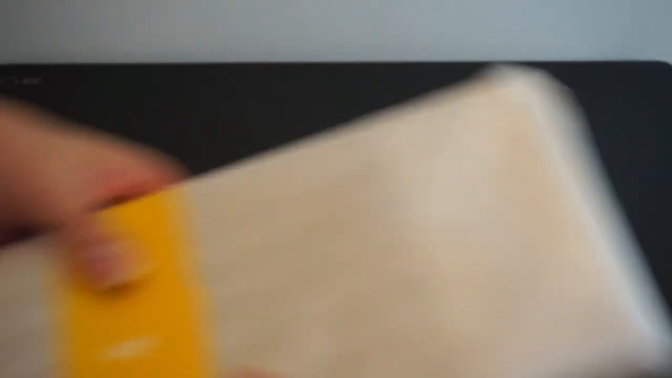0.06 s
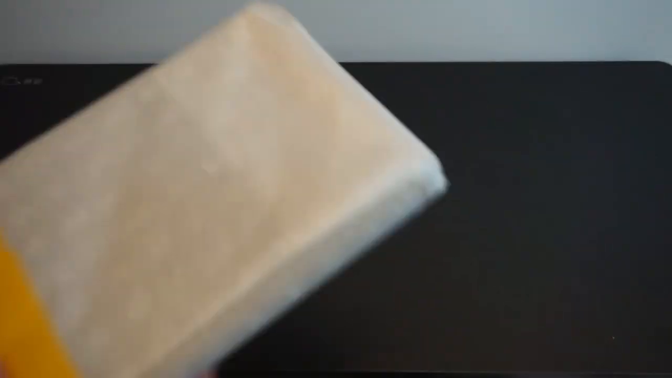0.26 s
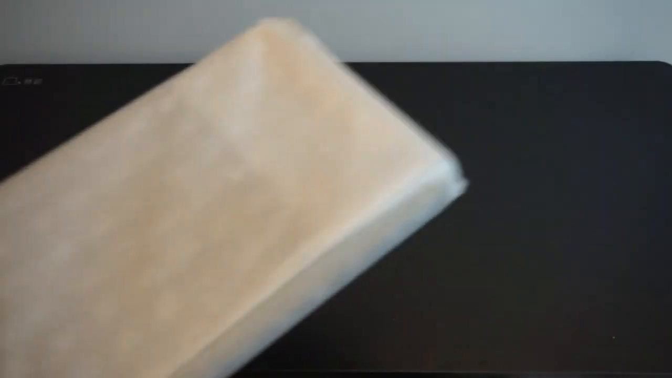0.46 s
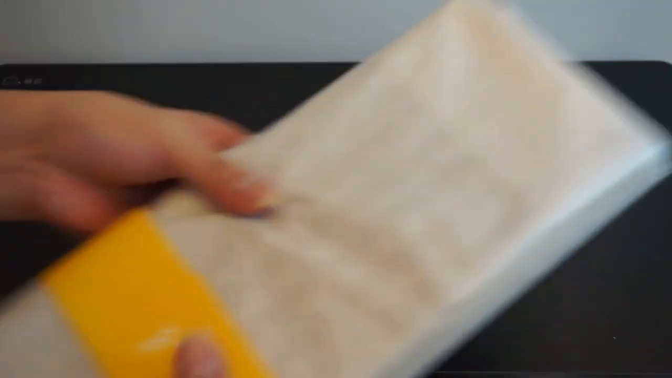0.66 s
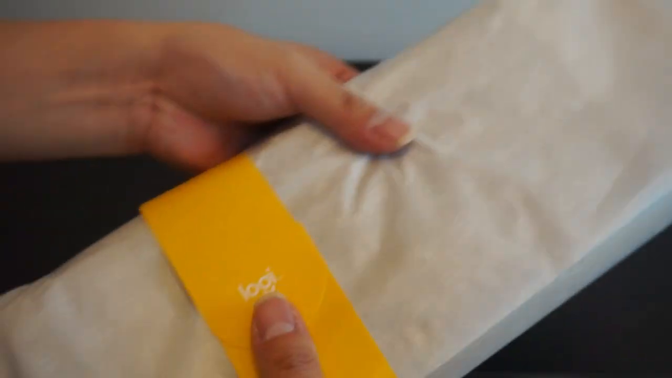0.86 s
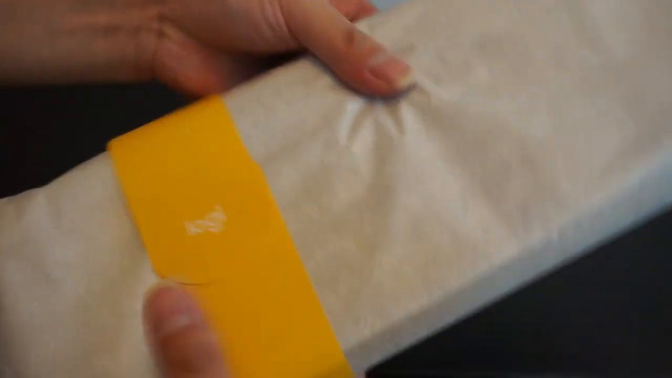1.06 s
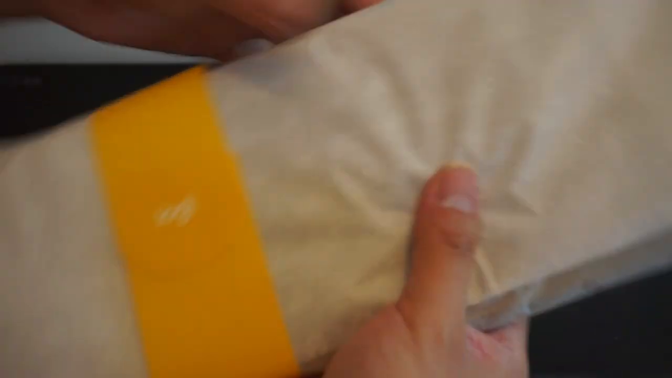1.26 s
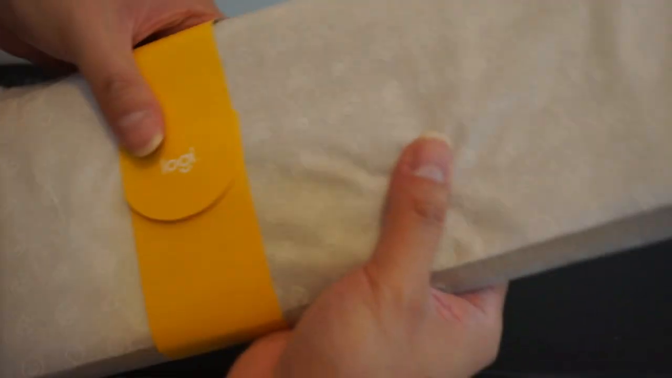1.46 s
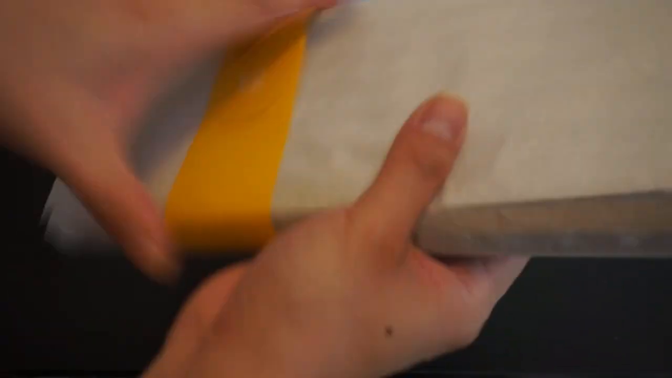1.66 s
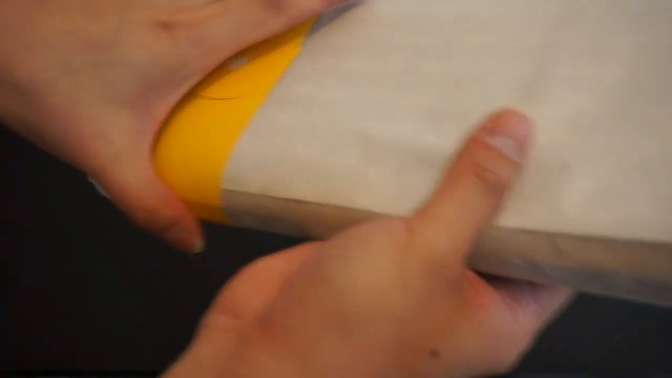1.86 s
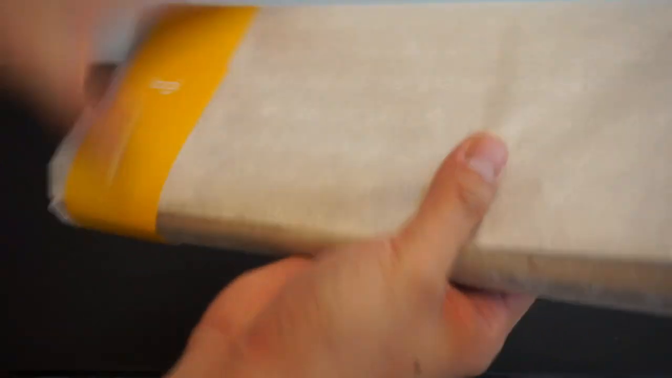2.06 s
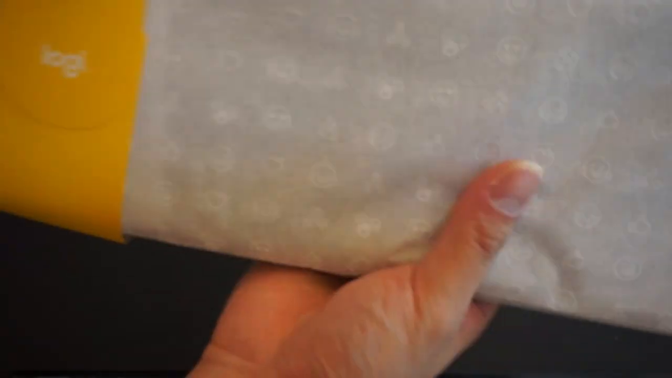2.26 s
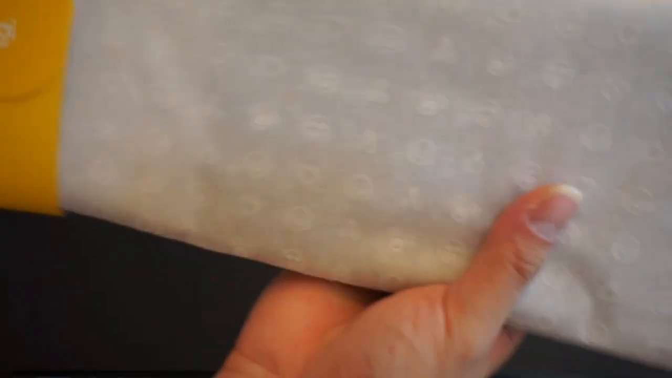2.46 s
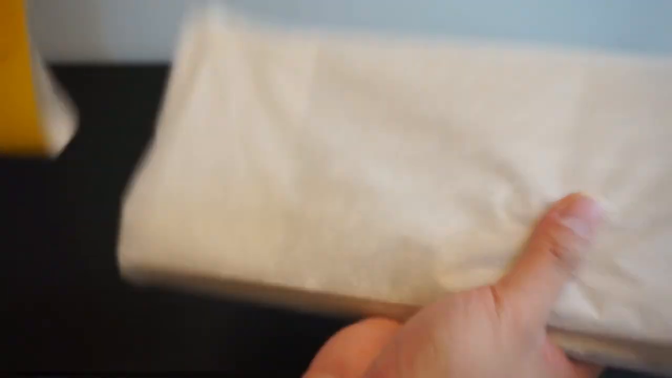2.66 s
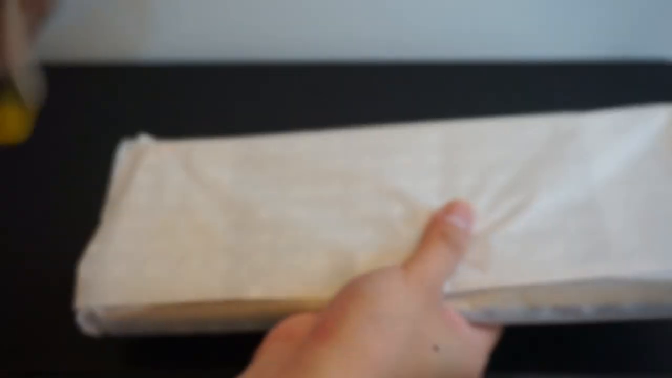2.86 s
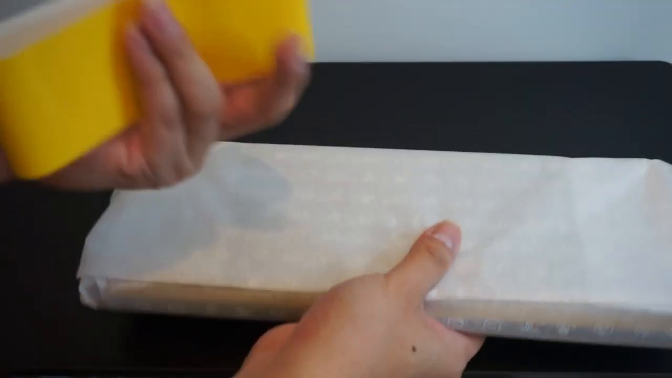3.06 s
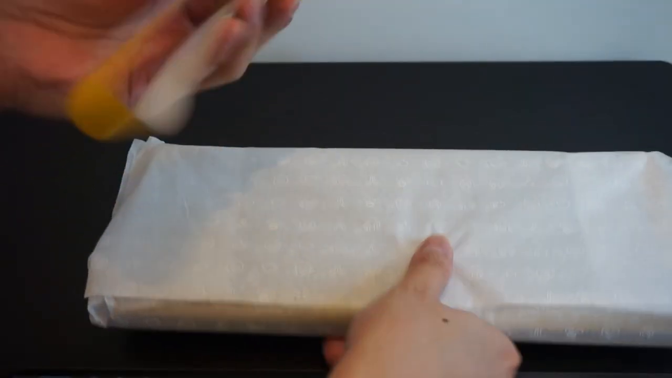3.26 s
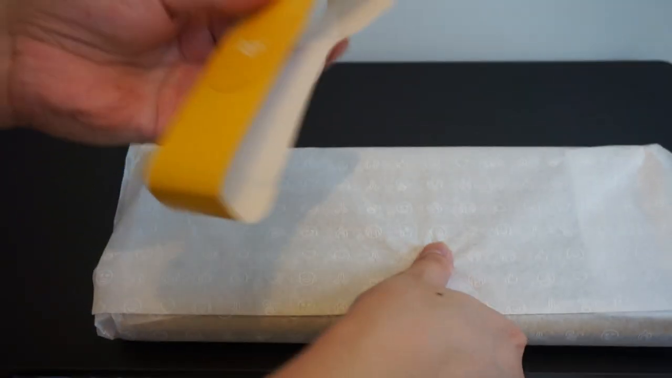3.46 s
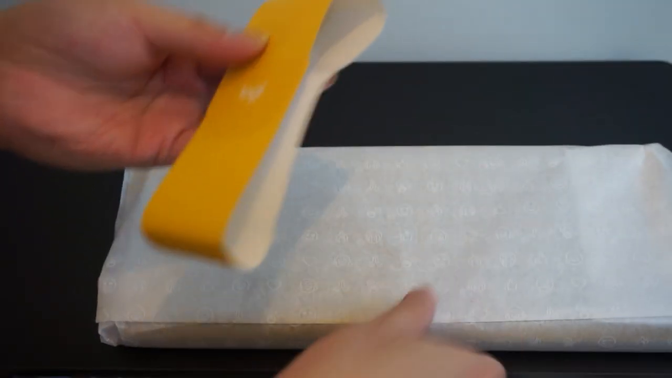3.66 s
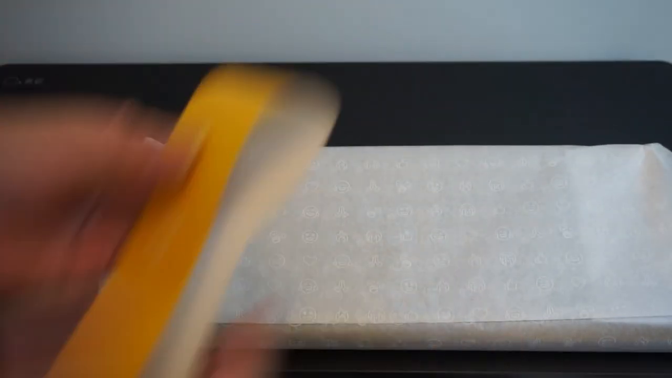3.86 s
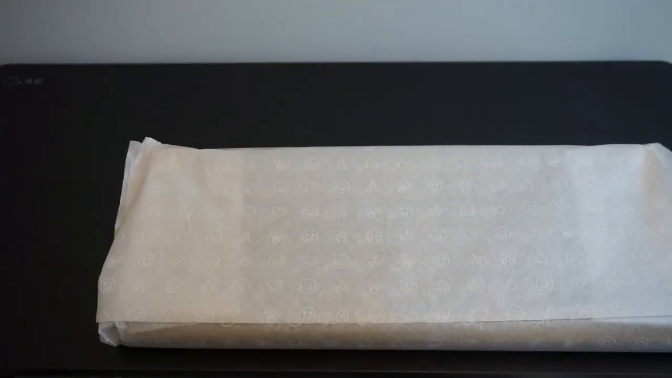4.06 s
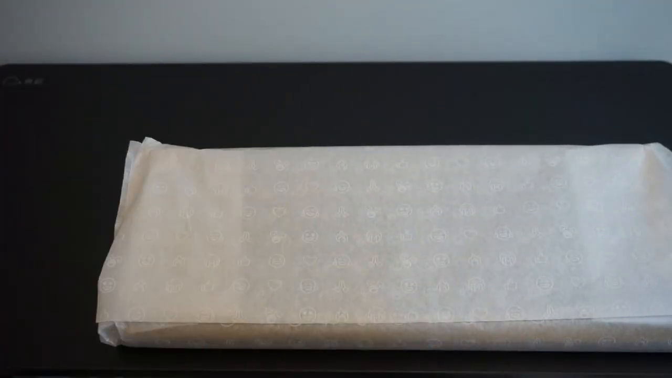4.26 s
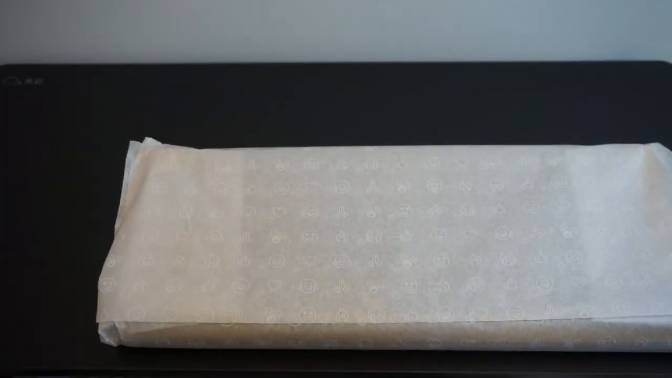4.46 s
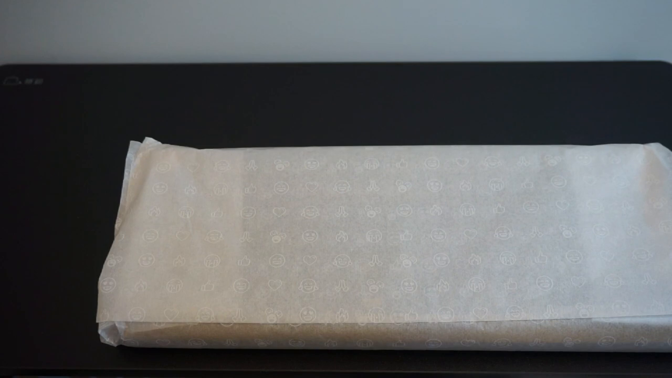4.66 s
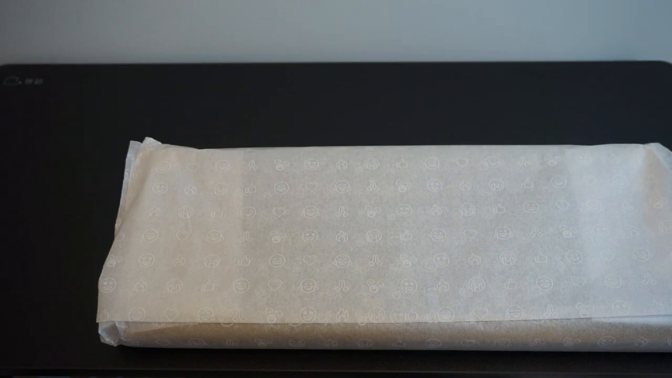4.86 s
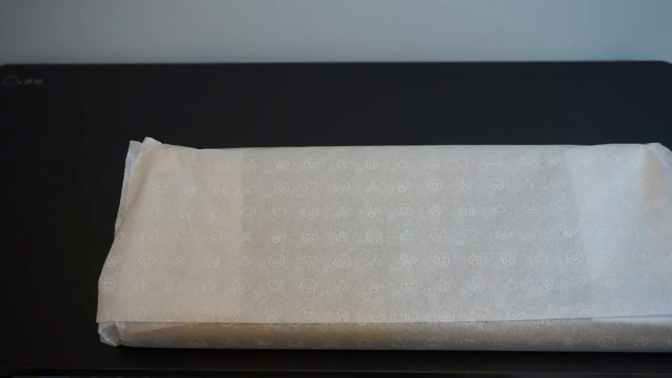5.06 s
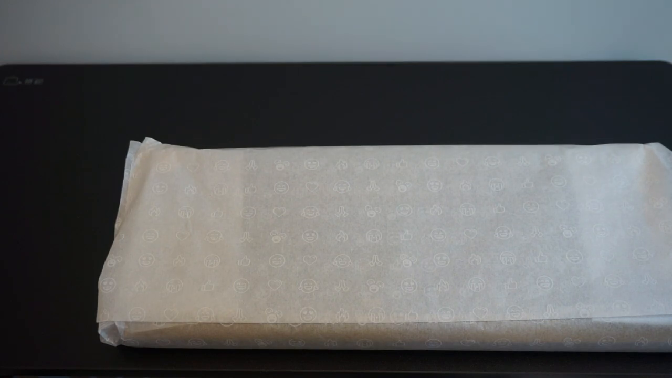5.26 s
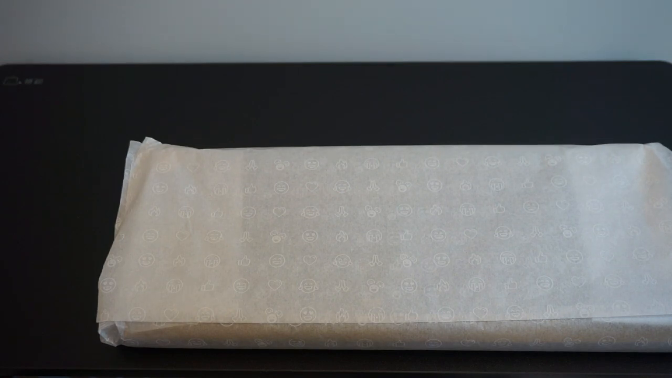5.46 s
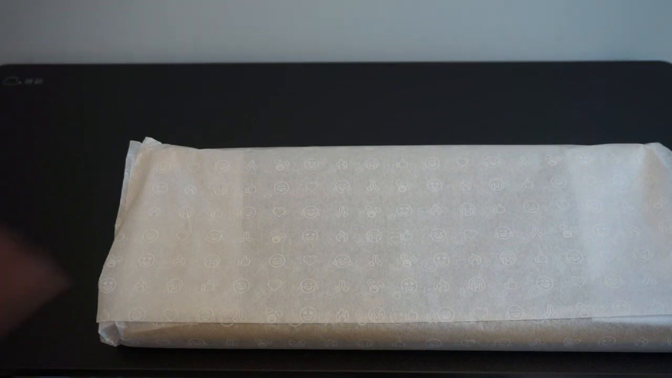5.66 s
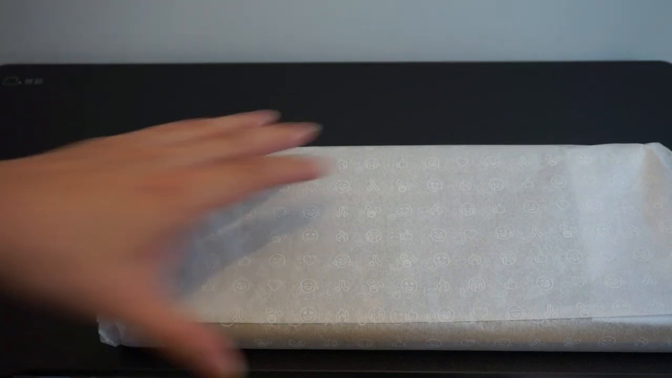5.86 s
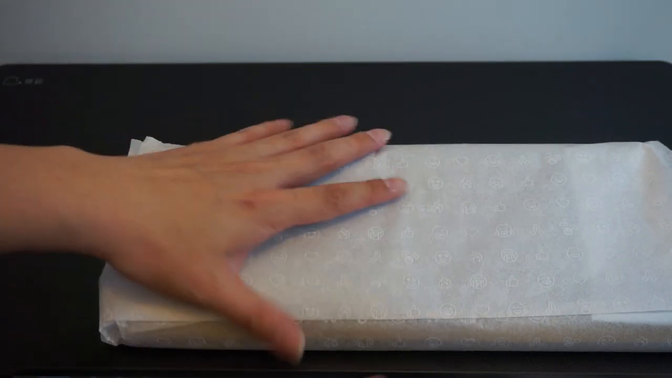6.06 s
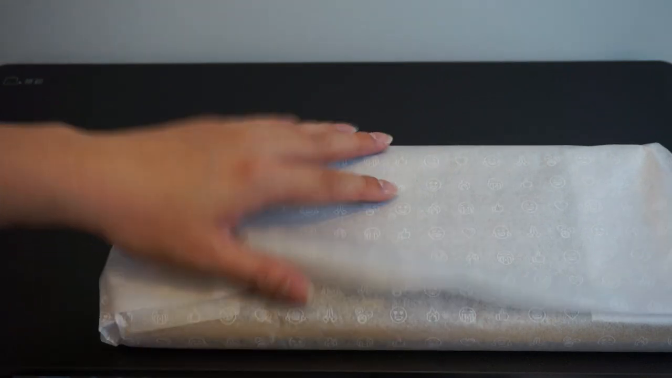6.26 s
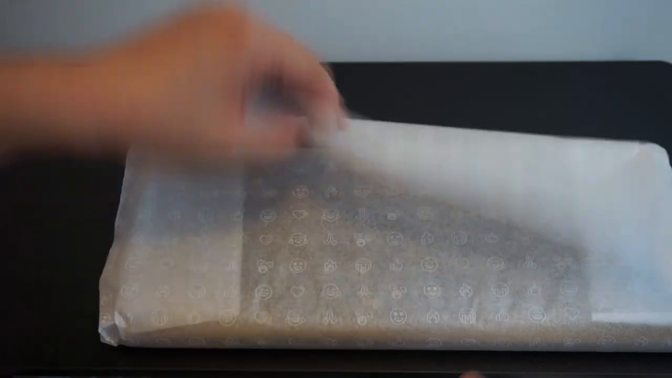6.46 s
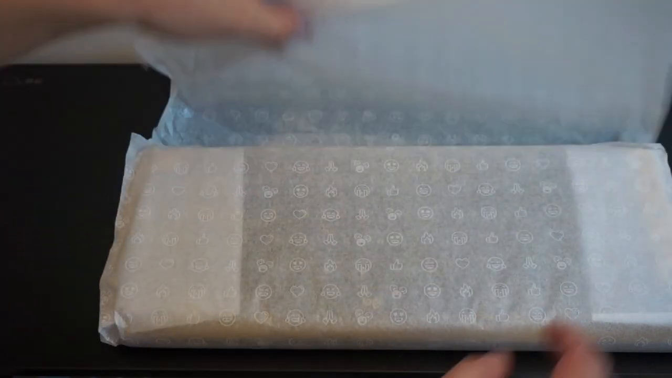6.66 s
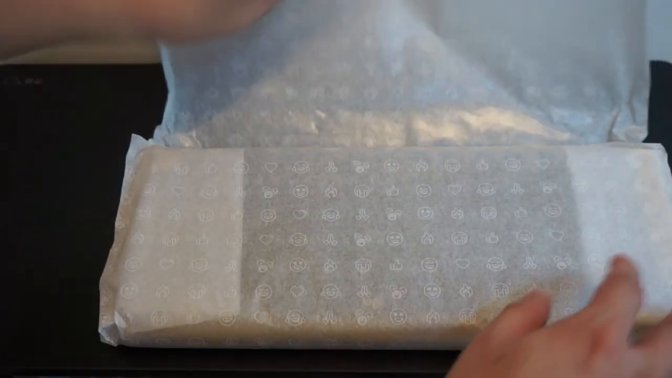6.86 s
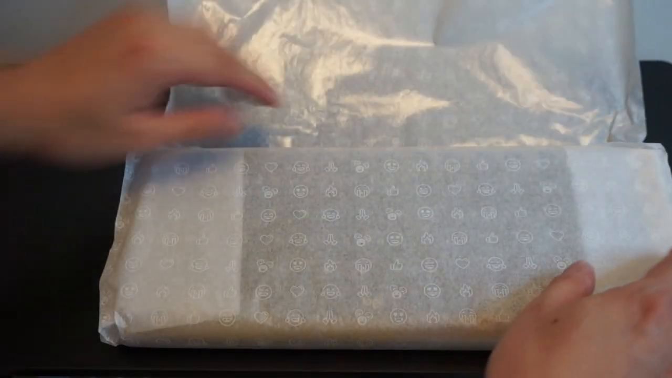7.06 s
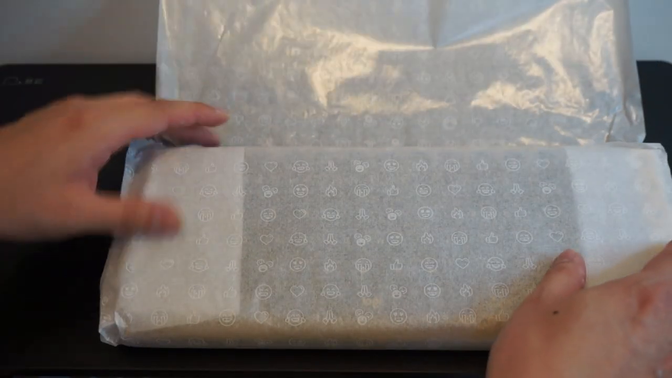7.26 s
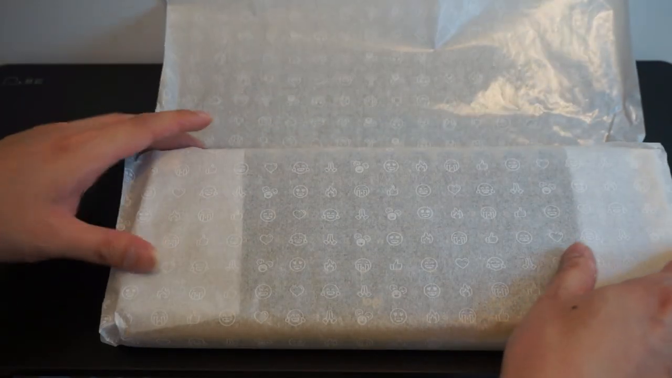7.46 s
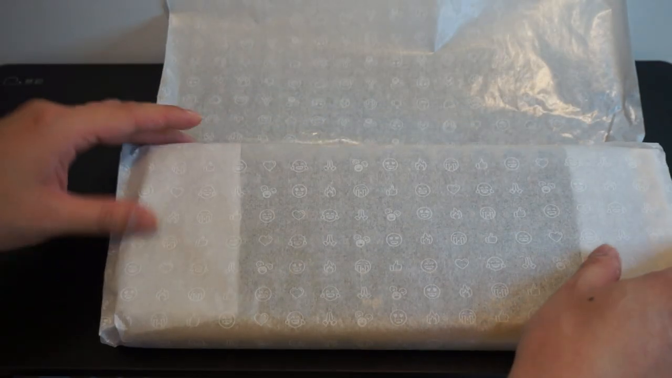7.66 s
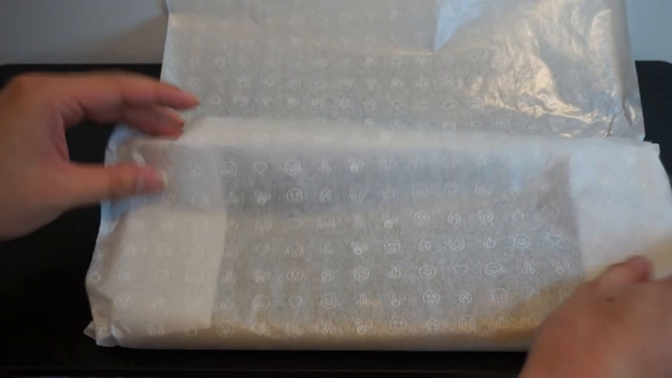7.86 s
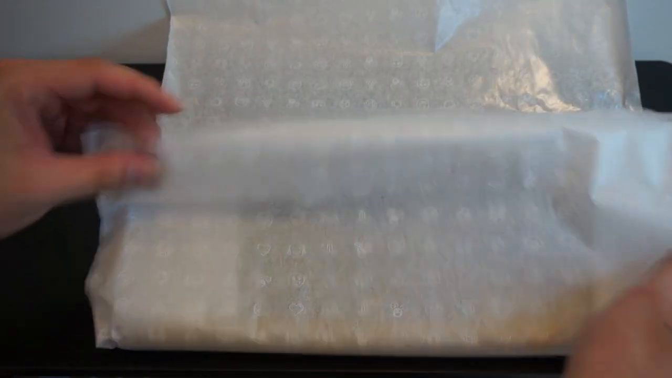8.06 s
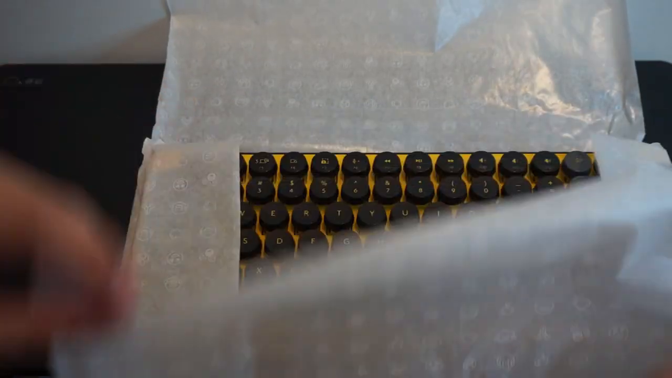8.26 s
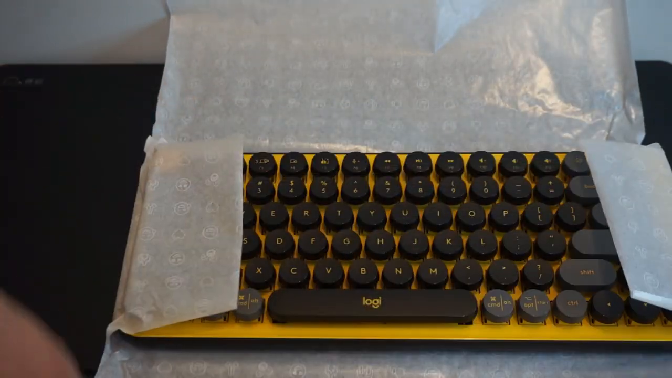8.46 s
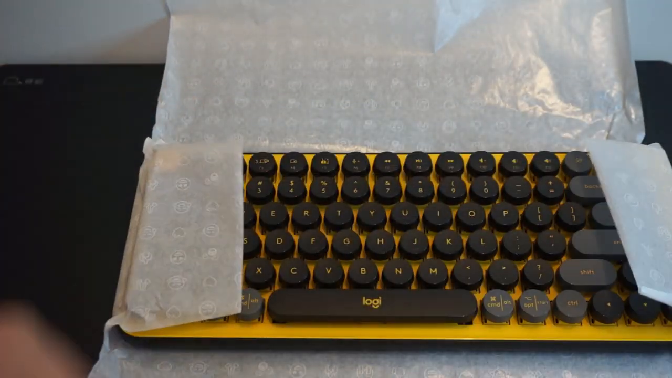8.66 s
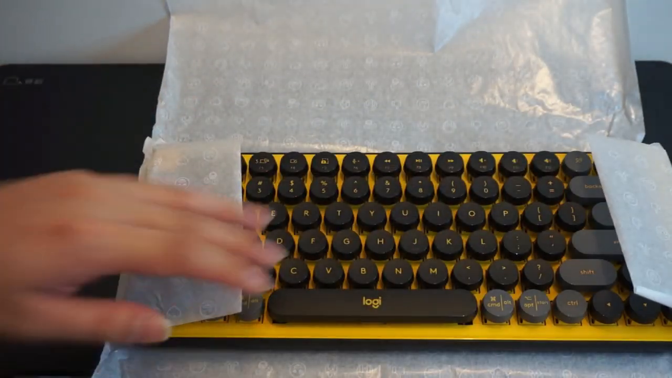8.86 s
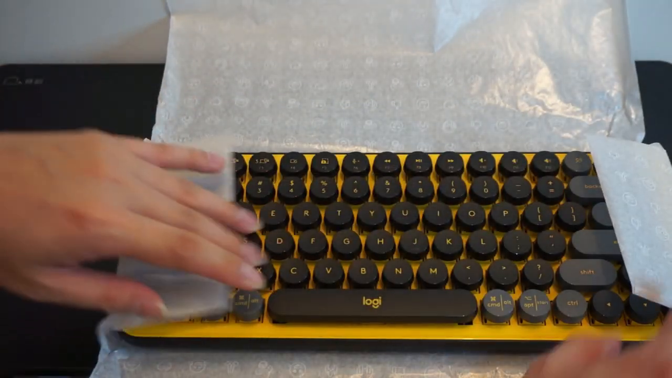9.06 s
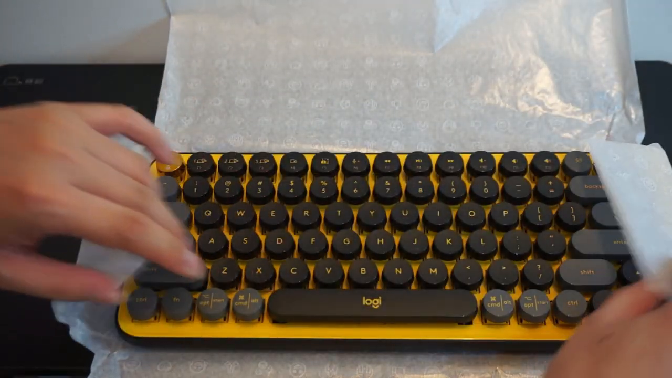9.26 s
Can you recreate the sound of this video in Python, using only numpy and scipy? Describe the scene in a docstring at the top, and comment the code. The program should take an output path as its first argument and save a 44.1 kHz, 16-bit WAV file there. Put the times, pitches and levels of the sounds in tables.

```python
"""Thin paper snaps and rustles close to a small stereo microphone, as hands turn a wrapped keyboard and unfold it.
The rustle is crackling noise shaped by the hands; snaps are short noise bursts, each from its own place on the sheet.
The parcel thuds on a desk, and further off its stiff paper band pops and drops: noise bursts with strong echoes.
A flap slides off with a narrow rasp. A lively room answers all but the rasp, over a steady bed of air and hiss."""
import sys
import numpy as np
from scipy import signal
from scipy.fft import rfft, irfft, next_fast_len
from scipy.io import wavfile
from scipy.ndimage import uniform_filter1d, map_coordinates

SR = 44100
rng = np.random.default_rng(int(sys.argv[2]) if len(sys.argv) > 2 else 0)


def transcribe(signal):
    """Save signal, clipped to [-1, 1], as a 16-bit WAV file at the path in sys.argv[1]."""
    frames = np.atleast_2d(signal).T
    limited = np.clip(frames, -1, 1)
    pcm = np.round(limited * 32767).astype(np.int16)
    wavfile.write(sys.argv[1], SR, pcm)


N = 411012  # length in samples

# Levels are relative; left-right is positive towards the left.
# Hands on the paper, one list per spell: [t/s, level/dB, brightness/dB, lean to the bright part/dB, left-right/dB]
HANDLING = [
    [(0, -36.5, -8, 0.5, -2), (.16, -48.5, -14, -3.5, 3.5), (.28, -45, -1, 4.5, 3),
     (.42, -35, -8.5, 1, 1.5), (.54, -45.5, -10.5, 0.5, 2.5), (.83, -42.5, -7, 2.5, 0),
     (1.08, -46, -13, -1, 2.5), (1.22, -53, -7, 0, -1), (1.59, -44, -12.5, 2.5, 2),
     (1.87, -41, -9.5, -3.5, -1.5), (2.05, -51, -6, 3.5, 2), (2.2, -47.5, -13, -1.5, 2),
     (2.45, -43.5, 0.5, 1, 2), (2.68, -46, -15, 3.5, 1.5), (2.84, -46, -14, -3.5, -1),
     (2.95, -63.5, 7, 10, 16), (3.09, -45, -7, -2, 1.5), (3.27, -54.5, -8, -6, 12),
     (3.47, -49, -7.5, 3.5, -2.5), (3.6, -38, -11, -7, 1)],
    [(3.95, -56.5, -6, 0, 1), (4.22, -62, -11, -12, -1), (4.45, -62, -3, 16, 4), (4.6, -50, -4, 6, 0),
     (4.86, -61, -6, -7, 0), (5.04, -64, -13, 0, .5)],
    [(6.053, -57.5, -5, -6, 0), (6.23, -39.5, -6, -2, -0.5), (6.43, -46, -10, 1.5, -0.5),
     (6.56, -39, -6.5, 1.5, 0), (6.78, -37.5, -15, 2.5, 0), (6.98, -44.5, -8.5, 1.5, 0),
     (7.15, -54, -5, 1, -1), (7.25, -43.5, -10, 3, 0.5), (7.4, -43, -6, 3.5, 1), (7.58, -44, -8, 2.5, -0.5),
     (7.75, -45, 0, -3.5, 0), (7.99, -38, -5, 3.5, 0.5), (8.24, -43, -6.5, 1.5, -0.5),
     (8.58, -36, -5.5, 2.5, -0.5), (8.74, -43, -4.5, 4.5, -0.5), (8.98, -49.5, -10.5, 5, -0.5),
     (9.17, -49, -5, 3, -1), (9.32, -40.5, -3, 6, -.5)],
]
# A fold gives way in a rush of crackle: [t/s, width/s, level/dB, brightness/dB]
SCRUNCHES = [(0.051, 0.018, -39, -10), (0.119, 0.0082, -36, -2), (0.21, 0.024, -36, -5),
             (0.33, 0.02, -52, -11), (0.413, 0.027, -35, 7), (0.479, 0.055, -31.5, -3.5),
             (0.581, 0.024, -31.5, -5), (0.619, 0.0055, -33, -15), (0.689, 0.029, -31, -12.5),
             (0.779, 0.017, -33.5, -10.5), (0.871, 0.057, -35, -15.5), (1.029, 0.016, -35, -8),
             (1.096, 0.025, -46, -6), (1.148, 0.032, -41, -7.5), (1.306, 0.042, -26, -11),
             (1.441, 0.053, -32, -10.5), (1.538, 0.0071, -40, -13), (1.61, 0.016, -35.5, -10),
             (1.668, 0.011, -32.5, -11.5), (1.739, 0.019, -37, -1), (1.782, 0.0059, -22.5, -10),
             (1.827, 0.017, -42, -8), (1.979, 0.069, -31, -2.5), (2.125, 0.027, -41, -2),
             (2.273, 0.04, -31, -12), (2.343, 0.01, -44, 3), (2.386, 0.0088, -29.5, -4),
             (2.444, 0.057, -34, -4), (2.568, 0.03, -33.5, -1), (2.609, 0.01, -31.5, 1),
             (2.746, 0.0086, -41.5, -7), (2.788, 0.017, -47, -6), (2.84, 0.0067, -31.5, -9),
             (3.107, 0.013, -59, -10), (3.361, 0.017, -39, -4), (3.443, 0.0099, -47, -9),
             (3.513, 0.011, -42.5, -15), (3.576, 0.029, -58, -23), (4.5, 0.08, -52.5, -12),
             (6.069, 0.02, -36, -11), (6.119, 0.039, -37, -7), (6.171, 0.02, -38, -7),
             (6.344, 0.01, -31.5, -14.5), (6.5, 0.016, -29, -2), (6.591, 0.021, -34, -3),
             (6.735, 0.04, -28.5, 4), (6.871, 0.028, -36, -5), (7.216, 0.052, -42.5, -6),
             (7.27, 0.019, -54, 1), (7.345, 0.031, -43, -4), (7.507, 0.025, -43, -2),
             (7.655, 0.069, -44, 0), (7.792, 0.013, -39, -9), (7.904, 0.025, -33.5, -8),
             (7.992, 0.012, -42, 23), (8.071, 0.014, -36, 24), (8.117, 0.033, -29, -0.5),
             (8.411, 0.012, -31.5, -2), (8.498, 0.058, -44, -2), (8.654, 0.033, -33.5, 0),
             (8.818, 0.0099, -42, 10), (8.882, 0.0071, -38.5, -1), (9.009, 0.015, -42.5, -12),
             (9.057, 0.033, -44.5, -16), (9.223, 0.031, -36, -3.5)]
# The loudest creases that snap: [t/s, level at the onset/dB, brightness/dB, left-right/dB]
LOUD_SNAPS = [(0.0045, -29, -13, 21), (0.0408, -22, -25, 2), (0.0528, -28, -26, 5), (0.1196, -30, -3, -4),
              (0.202, -22.5, -9, 2), (0.3172, -25, -12, 5), (0.3481, -19.5, -7.5, 3), (0.4045, -32, 12, 0),
              (0.4454, -21, -12, 10), (0.5726, -24, 2, 1), (0.6155, -25, -15, 3), (0.6444, -27, -2, -2),
              (0.7547, -37, 7, 6), (0.8355, -19.5, -11, 2), (0.8644, -12, -0.5, 1), (0.8785, -32, -5, 2),
              (0.8979, -22, -8, 0), (1.0106, -29, -20, 12), (1.0241, -22, -8, 1), (1.088, -42, -19, 0),
              (1.1966, -36, -1, -1), (1.2394, -24.5, 1, 3), (1.2815, -24, -4, 0), (1.3025, -22, 10, 12),
              (1.4022, -30, -20, -1), (1.4434, -27, -15, -3), (1.4666, -19, 5, 2), (1.5359, -22, 0, -2),
              (1.5903, -24.5, -8, 6), (1.6636, -14, 11, -1), (1.7015, -14.5, 9, 7), (1.7315, -16.5, -1, -2),
              (1.7464, -28, 15, 1), (1.7709, -26, -23, 1), (1.7823, -23.5, -6, -2), (1.8188, -26, -7, 9),
              (1.8726, -23, -3, 11), (1.8871, -12.5, 13, 3), (1.9176, -24, -6, 5), (2.0348, -25, 2, 3),
              (2.1964, -22, 4, -1), (2.2268, -17.5, -2, 2.5), (2.2517, -23, -14, -5),
              (2.2718, -13, -16, -1), (2.3426, -27, -14, -2), (2.3501, -25, 2, 1), (2.3815, -21, -4, 0),
              (2.388, -29, -13, 8), (2.4154, -17.5, -5.5, 3.5), (2.4453, -15.5, -28, 2),
              (2.4673, -20, 20, -1), (2.5651, -16, 21, -3), (2.6075, -23, 13, 3), (2.6589, -23, 15, 6),
              (2.7137, -20.5, -5, -5), (2.7412, -25, -13, -7), (2.7482, -39, -13, 0), (2.7826, -20, 19, 2),
              (2.8364, -20, -5, 0), (3.0927, -40, 6, 4), (3.1363, -16.5, -7, 2), (3.3573, -24, 2, -6),
              (3.4406, -28, -8, 0), (3.5054, -23, 0, 0), (3.5613, -31, -28, -3), (3.587, -21, -18, -1),
              (6.056, -42, 7, -1), (6.0866, -17.5, -7, 0), (6.118, -23, 9, 1), (6.1674, -21, -3, 1),
              (6.2467, -23, -4, 1), (6.341, -23, -2, 0), (6.3579, -22, -4, 0), (6.4657, -22, 9, 1),
              (6.4901, -16, 1, -1), (6.5006, -22, 3, 0), (6.5261, -14.5, -2.5, 0), (6.5825, -16, 14, -1),
              (6.6667, -17, 1, 2), (6.6962, -17.5, 13, -1), (6.7206, -15, 0, -1), (6.7297, -6.5, 10, -2),
              (6.8059, -21, 11, 1), (6.876, -23, 5, 0), (6.967, -32, 1, -2), (7.1881, -28.5, -6, -2),
              (7.219, -19, -3.5, -1), (7.3457, -12, 28, 0), (7.4594, -21, 8, 2), (7.5088, -26.5, -8, -1),
              (7.6525, -22, -2, 1), (7.7638, -17.5, -6, -1), (7.7762, -32, 13, 1), (7.8311, -21.5, 19, 1),
              (7.8595, -20, -5, -3), (7.8755, -11.5, 20, 2), (7.8915, -19, -3, -1), (7.9049, -9, 24, 1),
              (7.9847, -15, 15, 1), (7.9957, -19, 29.5, 1), (8.0626, -20, 3, 2), (8.108, -20, 0, 0),
              (8.1125, -9.5, 1, -1), (8.2132, -22.5, 0, 1), (8.2925, -36, 2, -3), (8.3524, -26, 12, -2),
              (8.3808, -14.5, 6, 1.5), (8.4098, -12, 11, -1), (8.4726, -18, 10, -2), (8.4861, -19, 13, 1),
              (8.4966, -8.5, 15, -1), (8.6168, -20, 7, -1), (8.6742, -18, -1, 1), (8.7495, -26.5, 7, -2),
              (8.8119, -20, 10, 0), (9.047, -31, -10, -2), (9.2204, -21.5, -5.5, 1)]

# The four blow tables share columns: [t/s, low/dB, body/dB, bright/dB, crisp/dB, nominal t60/s, push on the room/dB]
# The parcel meets the desk
DESK_THUDS = [(3.014, -43, -49, -46.5, -44, 0.15, 19), (3.048, -33.5, -68, -70, -74, 0.038, 22.5),
              (3.156, -25, -25.5, -31.5, -36.5, 0.17, 18), (3.209, -48, -32, -39, -37.5, 0.15, -8),
              (3.601, -25.5, -19.5, -26, -32, 0.18, 23), (3.632, -20, -19.5, -30.5, -57, 0.096, 25.5)]
# The parcel bumps in the hands
HAND_BUMPS = [(1.095, -40.5, -60, -60, -65, 0.11, 6), (1.145, -47, -55, -65, -65, 0.055, 6),
              (1.338, -23.5, -14.5, -44, -36, 0.025, 2.3), (1.795, -41, -60, -82, -65, 0.056, 8),
              (1.825, -41, -60, -65, -65, 0.14, 8), (1.872, -33.5, -55, -60, -60, 0.035, 9.1),
              (8.106, -32, -41, -55, -60, 0.025, 5)]
# The band flexes, away from the microphone
BAND_POPS = [(3.8276, -59, -35, -39, -32.5, 0.015, 12.7), (4.0175, -40, -35.5, -37, -39.5, 0.015, 15),
             (4.1647, -64, -51, -49.5, -47.5, 0.007, 20), (4.4476, -43, -42, -30.5, -30.5, 0.0099, 14.8)]
# The band touches down and lands at a distance, with a strong echo
BAND_DROP = [(5.0488, -41, -38, -34, -39, 0.0071, 22), (5.0686, -37, -12.5, -19, -31.5, 0.015, 25.2)]

# Colour of the paper: [f/Hz, level per Hz/dB]
PAPER_SPECTRUM = [(15, -97), (25, -20), (102, -27.5), (183, -22.5), (426, -3), (657, -11), (1210, -1),
                  (1780, -5), (2610, -3), (3550, -12.5), (6390, -8), (8040, -15.5), (10400, -11.5),
                  (11200, -20), (14600, 1), (22000, -120)]
# Colour of the parcel on the desk: [f/Hz, level per Hz/dB]
DESK_SPECTRUM = [(15, -68), (25, -24), (69, -27), (90, -29), (115, -9), (179, -14), (330, -1), (625, -23.5),
                 (766, -20), (1490, -24), (1780, -34), (3040, -39), (3640, -45.5), (6720, -42),
                 (11200, -54.5), (14600, -90), (22000, -120)]
# Colour of the band flexing: [f/Hz, level per Hz/dB]
FLEX_SPECTRUM = [(180, -22), (300, -12), (452, -4), (550, -9), (1120, 7), (1590, 0), (2950, -1),
                 (3820, -16.5), (11200, -17), (14600, -45), (22000, -120)]
# Colour of the band landing: [f/Hz, level per Hz/dB]
LANDING_SPECTRUM = [(180, -49), (300, -36), (602, -28.5), (744, -18), (920, -11), (1340, -0.5),
                    (1710, -16.5), (2580, -15), (3820, -27.5), (10200, -35), (11200, -40), (14600, -69),
                    (22000, -120)]
# Colour of the room tone: [f/Hz, level per Hz/dB]
AIR_SPECTRUM = [(15, -83), (25, -53), (142, -18.5), (183, -22.5), (208, -12.5), (249, -15), (276, -6.5),
                (437, -5.5), (550, -4.5), (674, -8), (827, -5.5), (2020, -20), (11200, -28.5), (14600, -75),
                (22000, -120)]
# Left-right likeness of diffuse sound: [f/Hz, likeness 0-1]
DIFFUSE_LIKENESS = [(60, 0.79), (170, 0.93), (490, 0.87), (1400, 0.77), (4000, 0.65), (11400, 0.96)]
# How long the room rings: [f/Hz, t60/s]
ROOM_T60 = [(150, 0.53), (800, 0.55), (2000, 0.62), (5500, 0.68), (10000, 0.65)]

# Borders between the low, body, bright and crisp parts of a sound: [f/Hz]
PART_BORDERS = [620, 1720, 3600]
# How far brightness moves the low, body, bright and crisp parts: [dB per dB]
BRIGHTNESS_TILT = [0.096, -0.86, -0.23, 0.5]
# Balance of the four parts at brightness 0, in dB
SNAP_DB, SCRUNCH_DB, RUB_DB = [-40.5, -1.9, -6, 7.5], [-26.5, -4.4, -6, 6], [-5, -2.7, -1.5, 7.46]

# Lesser creases: rate, level over the rubbing, scatter of level and of brightness
SMALL_PER_S, SMALL_DB, SMALL_SPREAD_DB, SMALL_TILT_DB = 14, 14, 3, 2
OWN_COLOUR_DB = 3  # scatter of the four parts from crease to crease
RISE, FADE = 0.87, 1.19  # a scrunch swells and fades over these shares of its width
SLIDE_S = (7.62, 7.66, 7.92, 8.05)  # the flap is drawn off: start, full, fading, end
SLIDE_DB, SLIDE_HZ, SLIDE_WIDTH_HZ = -41.5, 1690, 1100
AIR_DB = -56.5  # rms before the bass cut and band limit
TOP_HZ = 11200  # band limit


def rustle():
    """The sheet slides and flexes: fine crackle over a soft hiss of friction."""
    t = np.arange(N) / SR
    level_db, bright_db, lean_db, place_db = hands(t)
    levels = amp(parts(level_db, bright_db, lean_db, RUB_DB))
    for mid, width, db, bright in SCRUNCHES:
        start = max(round((mid - 2 * width) * SR), 0)
        near_fold = slice(start, round((mid + 3 * width) * SR))
        from_mid = t[near_fold] - mid
        away = from_mid / (width * np.where(from_mid < 0, RISE, FADE))
        lean = lean_db[round(mid * SR)]
        levels[:, near_fold] += amp(parts(db, [bright], lean, SCRUNCH_DB) - 20 * away ** 2)

    force = np.clip((level_db + 58) / 10, 0, 1)  # a light touch only hisses
    both = force * crackle(250, spread_db=4.5, t60=0.029)
    fine = force * crackle(260, spread_db=9.5, t60=0.029)
    low = 1 + 0.67 * both
    body = 0.92 + .5 * both
    bright_part = 2.8 + .5 * both + 0.12 * fine
    crisp = .5 + 0.54 * both + .5 * fine
    grain = np.array([low, body, bright_part, crisp])
    # crackle shares out the energy, adds none
    grain /= np.sqrt(np.abs(uniform_filter1d(grain ** 2, SR // 8)))

    noise = rng.standard_normal((4, 2, N))
    near = voiced((grain * levels)[:, None] * noise, PAPER_SPECTRUM)
    near = spread(near, [(200, 0.79), (1400, 0.81), (4000, 0.54), (10000, 0.74)])  # (f/Hz, likeness)
    placed = near * amp([place_db / 2, -place_db / 2])
    return placed + amp(-14.0) * room(near[0])


def crackle(per_s, spread_db, t60):
    """Gain of countless small creases: random starts in clumps, some larger, each dying fast."""
    chance, size = rng.random(N), rng.standard_normal(N)
    # a smooth random curve with a new value every 1000 samples
    clumps = map_coordinates(rng.standard_normal(N // 1000 + 4), [np.arange(N) / 1000])
    starts = (chance < per_s / SR) * amp(spread_db * size + 6.2 * clumps)
    return unit(signal.lfilter([1], [1, -amp(-60 / (t60 * SR))], starts))


def snaps(count=130):
    """Single creases buckle, each heard from its own place on the sheet; lesser ones come at random."""
    draw, size = rng.standard_normal((count, 2)), rng.exponential(size=(count, 2))
    at = np.cumsum(size[:, 0]) / SMALL_PER_S % (N / SR)  # times past the end wrap round
    level_db, bright_db, _, place_db = hands(at)
    small_level_db = level_db + SMALL_DB + SMALL_SPREAD_DB * np.minimum(size[:, 1], 2)
    small_bright_db = bright_db + 4 + SMALL_TILT_DB * draw[:, 0]
    small = np.c_[at, small_level_db, small_bright_db, place_db + 2.5 * draw[:, 1]]

    s, onset_db, bright_db, place_db = np.vstack([LOUD_SNAPS, small]).T
    sides = amp(np.outer(place_db, [.5, -.5]))
    levels_db = parts(onset_db, bright_db, hands(s)[2], SNAP_DB).T
    levels_db = levels_db + OWN_COLOUR_DB * rng.standard_normal((len(s), 4))
    near = bursts(s, levels_db, [.012] * len(s), sides, .0004, PAPER_SPECTRUM)
    return near + amp(-5) * room(near.mean(axis=0))


def hands(t):
    """Level, brightness, lean and place of the handling at times t; silent between spells."""
    s, *cols = np.transpose(np.vstack(HANDLING))
    level_db, *others = (np.interp(t, s, c) for c in cols)
    touched = sum((t > rows[0][0]) & (t < rows[-1][0]) for rows in HANDLING)
    return np.where(touched, level_db, -120), *others


def slide():
    """The last flap drags over the sheet below: noise through a two-fold resonance makes a narrow, even rasp."""
    def resonance(f):
        damping = 1j * f * SLIDE_WIDTH_HZ
        return (damping / (SLIDE_HZ ** 2 - f * f + damping)) ** 2

    rasp = unit(spread(filtered(rng.standard_normal((2, N)), resonance), DIFFUSE_LIKENESS))
    stroke = np.interp(np.arange(N) / SR, SLIDE_S, [0, 1, 1, 0])
    return amp(SLIDE_DB) * stroke * rasp


def parcel():
    """Blows of the parcel: thuds in the colour of the desk, bumps in the hands in that of the paper."""
    thuds = knocks(DESK_THUDS, DESK_SPECTRUM, rise=0.00097)
    return thuds + knocks(HAND_BUMPS, PAPER_SPECTRUM, rise=0.0016)


def paper_band():
    """The stiff band pops as it flexes, then drops: short bursts at a distance, with a strong echo."""
    pops = knocks(BAND_POPS, FLEX_SPECTRUM, rise=0.00051)
    return pops + knocks(BAND_DROP, LANDING_SPECTRUM, rise=0.00068)


def knocks(rows, spectrum, rise):
    """Blows as direct bursts plus an echo, whose strength is set for each blow."""
    rows = np.array(rows)
    times, levels_db, t60s, room_db = rows[:, 0], rows[:, 1:5], rows[:, 5], rows[:, 6:]
    pushes = np.zeros((4, 1, N))  # the walls are excited by the whole blow at once
    pushes[:, 0, np.round(times * SR).astype(int)] = amp(levels_db + room_db).T
    direct = bursts(times, levels_db, t60s, [[1]] * len(rows), rise, spectrum)
    return amp(2.0) * (direct + room(voiced(pushes, spectrum)[0]))


def bursts(times, levels_db, t60s, sides, rise, spectrum):
    """Dying bursts of noise, each with its own strength in the four parts; the treble is over sooner."""
    drive = np.zeros((4, len(sides[0]), N + SR))
    t = np.arange(SR // 5) / SR
    power = np.abs(rfft(voices(spectrum), len(t))) ** 2
    for s, db, t60, side in zip(times, levels_db, t60s, sides):
        decay = amp(-60 * t / (t60 * np.c_[[1.5, 1.1, .8, .55]]))
        shape = decay * (1 - np.exp(-t / rise))
        burst = shape * rng.standard_normal(len(t))
        energy = np.mean(np.abs(rfft(burst)) ** 2 * power, axis=1)  # what this noise happens to put in each part
        gain = amp(db) * np.sqrt(np.sum(shape ** 2, axis=1) / energy)
        at = round(s * SR)
        drive[..., at:at + len(t)] += (np.c_[gain] * burst)[:, None] * np.c_[side]
    return voiced(drive[..., :N], spectrum)


def room(x):
    """The walls' answer: noise in which each frequency dies at its own speed."""
    hz, t, z = signal.stft(rng.standard_normal((2, SR)), SR, nperseg=256)
    decay = amp(-60 * t / along(ROOM_T60, hz)[:, None])
    tail = signal.istft(z * decay, SR, nperseg=256)[1]
    tail *= 1 - np.exp(-np.arange(tail.shape[1]) / SR / 0.0028)  # echoes build up
    tail = spread(tail, DIFFUSE_LIKENESS)
    return signal.oaconvolve(x[None], tail / np.linalg.norm(tail[0]), axes=1)[:, :N]


def room_tone():
    """Steady air and microphone hiss: coloured noise, partly alike left and right."""
    noise = filtered(rng.standard_normal((2, N)), lambda hz: amp(along(AIR_SPECTRUM, hz)))
    return amp(AIR_DB) * unit(spread(noise, DIFFUSE_LIKENESS))


def parts(level_db, bright_db, lean_db, base_db):
    """Shares a level out among the four parts: brightness shifts it from body to crisp, lean lifts the bright part."""
    db = np.c_[base_db] + np.c_[BRIGHTNESS_TILT] * np.asarray(bright_db)
    db[2] += lean_db
    return db + level_db - 10 * np.log10(np.sum(amp(2 * db), axis=0))


def voices(spectrum, size=4096):
    """Causal (minimum-phase) responses of energy 1 for the four parts of a spectrum."""
    hz = np.fft.rfftfreq(size, 1 / SR)
    below = 1 / (1 + (hz / np.c_[PART_BORDERS]) ** 12)
    share = np.abs(np.diff(below, axis=0, prepend=0, append=1))  # of the power, in each part
    gain = amp(along(spectrum, hz)) * np.sqrt(share)
    cepstrum = irfft(np.log(gain + 1e-6))
    cepstrum[:, 1:size // 2] *= 2  # folding the cepstrum forward makes the response causal
    cepstrum[:, size // 2 + 1:] = 0
    return unit(irfft(np.exp(rfft(cepstrum)))) / np.sqrt(size)


def voiced(drive, spectrum):
    """One drive for each part of the spectrum, summed."""
    return signal.oaconvolve(drive, voices(spectrum)[:, None], axes=-1).sum(axis=0)[:, :N]


def spread(pair, alike):
    """Two unrelated signals mixed to a left and right of given likeness."""
    def mid_side(hz):
        turn = np.arccos(np.clip(along(alike, hz), -1, 1)) / 2
        return np.array([np.cos(turn), np.sin(turn)])

    mid, side = filtered(pair, mid_side)
    return np.array([mid + side, mid - side])


def filtered(x, response):
    """x times a response of frequency."""
    m = next_fast_len(x.shape[-1] + 8192)
    return irfft(rfft(x, m) * response(np.fft.rfftfreq(m, 1 / SR)), m)[..., :x.shape[-1]]


def along(points, hz):
    """Interpolates (f/Hz, value) points on a log frequency axis."""
    f, v = np.transpose(points)
    return np.interp(np.log(hz + 1), np.log(f + 1), v)


def amp(db):
    """dB to gain."""
    return 10 ** (np.asarray(db) / 20)


def unit(x):
    """Each row at rms 1."""
    return x / np.sqrt(np.mean(x ** 2, axis=-1, keepdims=True) + 1e-20)


def scene():
    """Everything at the microphone, a touch louder on the left."""
    paper = rustle() + snaps() + slide()
    return (paper + parcel() + paper_band() + room_tone()) * amp([[.2], [-.2]])


def record(dry):
    """A bass cut, levelling off 9 dB down below 100 Hz, and nothing above the band limit."""
    def response(hz):
        bass = amp(-9) + (1 - amp(-9)) / np.sqrt(1 + (100 / (hz + 1)) ** 14)
        return bass * (hz < TOP_HZ)

    return filtered(dry, response)


dry = scene()
out = record(dry)
transcribe(out)
```